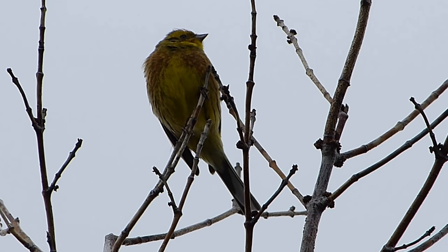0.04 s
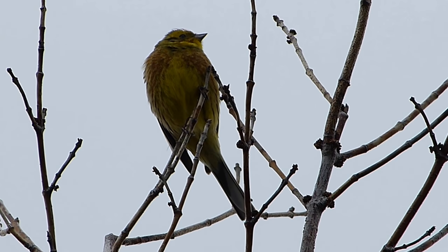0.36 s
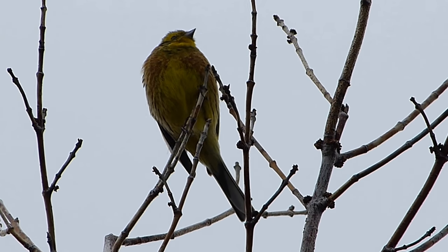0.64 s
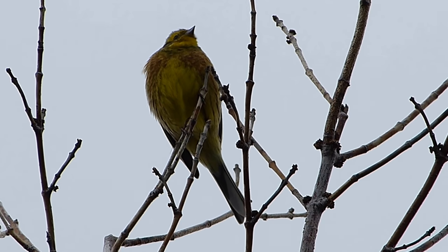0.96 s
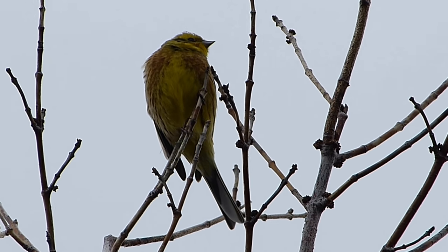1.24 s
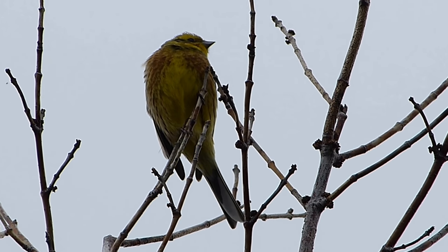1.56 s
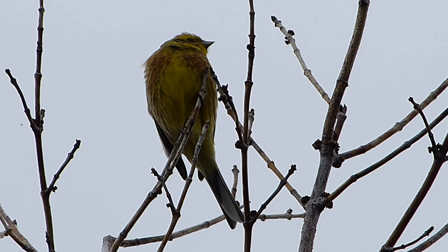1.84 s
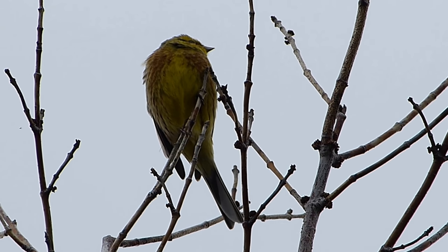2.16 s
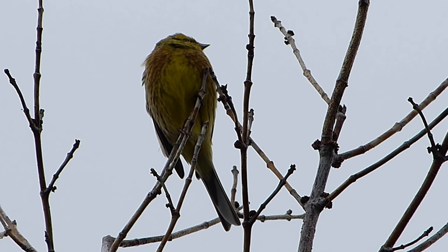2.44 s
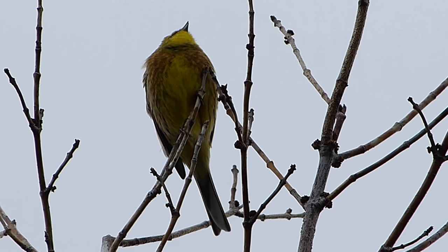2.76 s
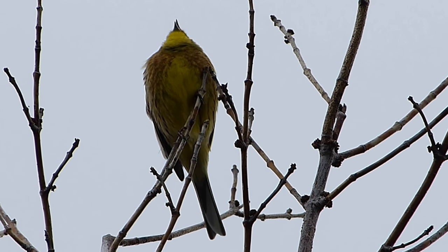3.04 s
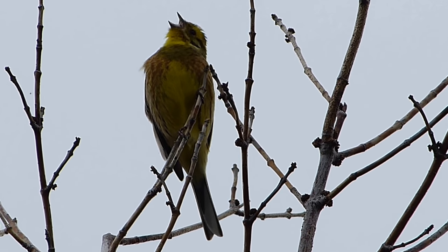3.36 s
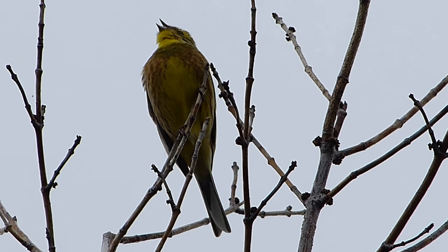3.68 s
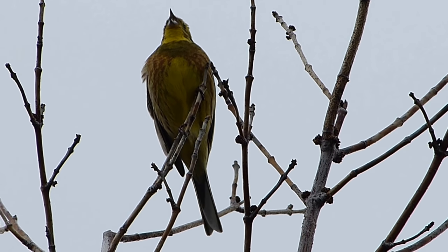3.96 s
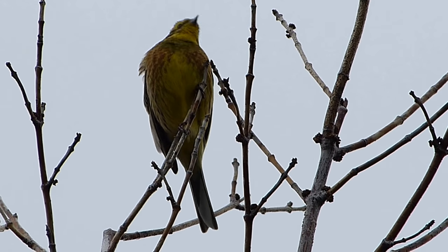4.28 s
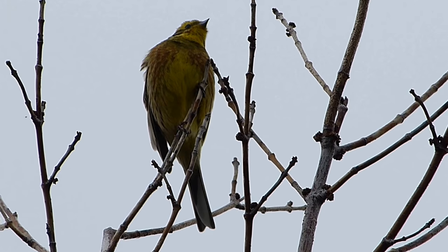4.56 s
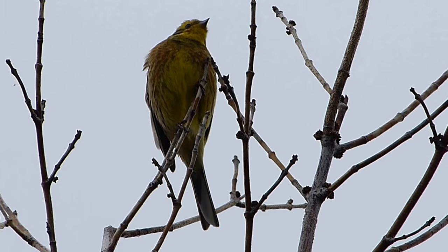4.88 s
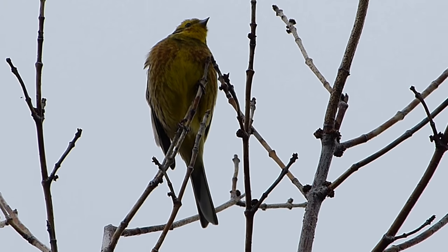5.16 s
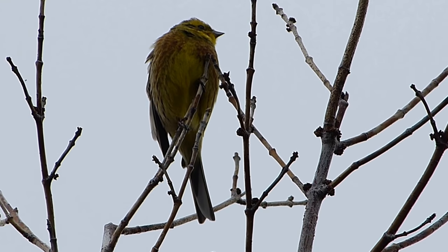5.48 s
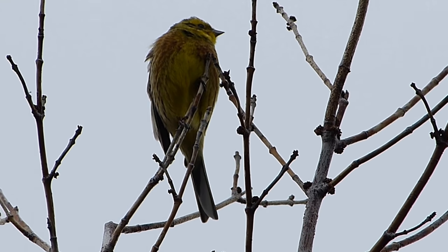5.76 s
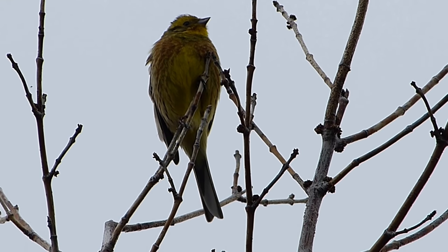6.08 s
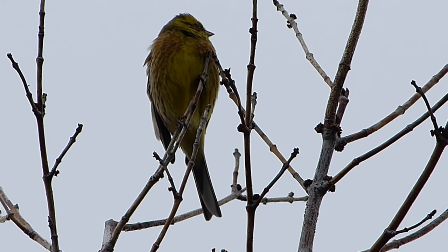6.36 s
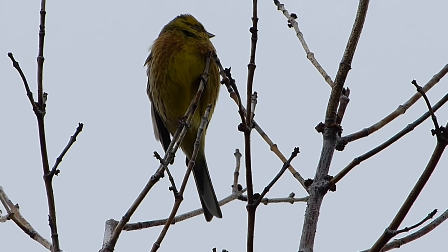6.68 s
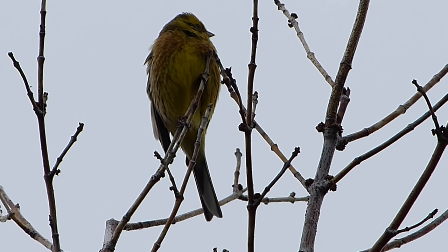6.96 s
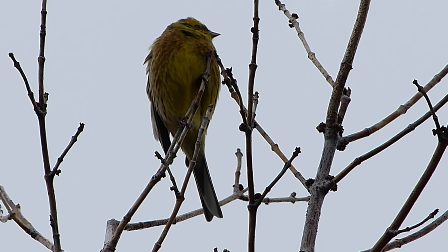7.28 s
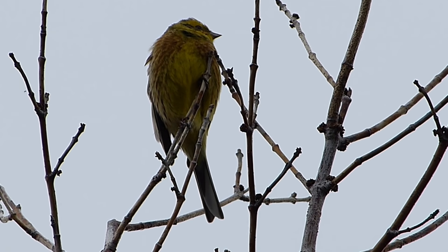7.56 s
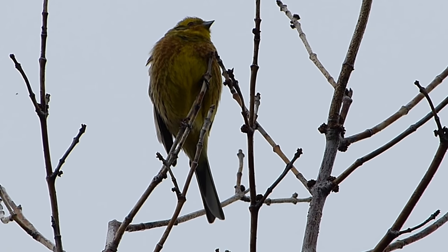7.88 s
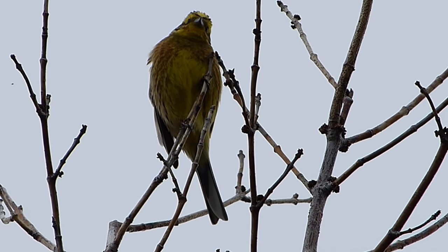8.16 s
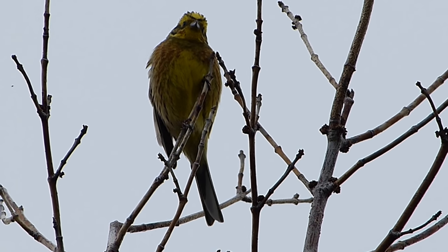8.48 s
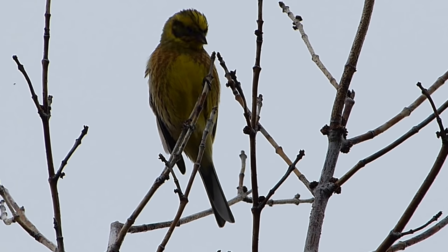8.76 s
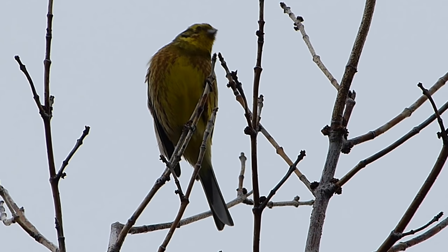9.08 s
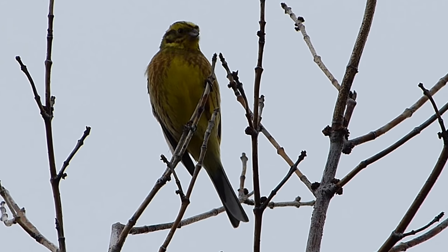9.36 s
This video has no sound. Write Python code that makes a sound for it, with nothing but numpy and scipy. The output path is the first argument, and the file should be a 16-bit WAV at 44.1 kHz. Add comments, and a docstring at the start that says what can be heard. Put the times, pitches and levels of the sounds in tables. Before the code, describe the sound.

A nearby songbird sings one swelling run of rapid, rattling whistles, while distant birds chirp over a faint traffic hush.

```python
"""Among trees, with distant traffic hushing to the left and one faint low hoot at the start.
Near the microphone a yellowhammer on a bare treetop sings ten alike syllables, swelling: each is a
trilled whistle, a hook and a rattle from both sides of the syrinx. Twigs scatter the song and the
trees around answer. Other birds chirp and buzz farther off."""
import sys
import numpy as np
from scipy import signal
from scipy.fft import rfft, irfft, next_fast_len
from scipy.io import wavfile
from scipy.ndimage import map_coordinates

SR = 44100
rng = np.random.default_rng(int(sys.argv[2]) if len(sys.argv) > 2 else 0)


def store_pcm(level_fs):
    """Save levels as 16-bit WAV."""
    pcm = np.round(np.clip(level_fs, -1, 1) * 32767).astype(np.int16)
    wavfile.write(sys.argv[1], SR, np.atleast_2d(pcm).T)


N = 420273


def amp(db):
    """Decibels to amplitude."""
    return 10 ** (np.asarray(db) / 20)


def unit(x):
    """x scaled to rms 1."""
    return x / np.sqrt(np.mean(x ** 2) + 1e-20)


def along(points, hz):
    """Reads (Hz, value) points on a log frequency axis."""
    knots_hz, values = np.transpose(points)
    return np.interp(np.log(hz + 1), np.log(knots_hz), values)


def clock(length_s):
    """Sample times in seconds."""
    return np.arange(int(length_s * SR)) / SR


def gate(t, start, end, edge):
    """Opens at start and closes at end, with smooth edges."""
    return np.sin(np.pi / 2 * np.clip(np.minimum(t - start, end - t) / edge, 0, 1)) ** 2


def wobble(t, rate):
    """A smooth random curve, rate knots a second."""
    return map_coordinates(rng.standard_normal(256), [(t - t[0]) * rate], mode="wrap")


def sine(hz):
    """A tone of rms 1 on a moving pitch."""
    return np.sqrt(2) * np.sin(2 * np.pi * (np.cumsum(hz) / SR + rng.random()))


def add(track, start_s, sound):
    """Lays a sound into a track."""
    part = track[max(round(start_s * SR), 0):][:len(sound)]
    part += sound[:len(part)]


def filtered(x, response):
    """x shaped by a gain that depends on frequency."""
    size = next_fast_len(N + SR // 2)
    return irfft(rfft(x, size) * response(np.fft.rfftfreq(size, 1 / SR)), size)[..., :N]


def rush(colour, likeness):
    """Stereo noise of rms 1 with a given colour and left-right likeness."""
    def mid_and_side(hz):
        angle = np.arccos(np.clip(along(likeness, hz), -1, 1)) / 2
        return colour(hz) * [np.cos(angle), np.sin(angle)]
    mid, side = filtered(rng.standard_normal((2, N)), mid_and_side)
    return unit(np.array([mid + side, mid - side]))


# The traffic's slow rise and fall: time_s, relative_level_db
TRAFFIC_SWELL = [(0.0, -60.5), (0.66, -62), (4.88, -62), (5.81, -60.5), (7.17, -61.5), (7.48, -60.5),
                 (9.53, -60.5)]
# Its colour before the air dulls it: frequency_hz, density_db
TRAFFIC_COLOUR = [(60, -12.5), (190, -8), (250, -6), (340, -2), (480, -3.5), (720, 0), (900, -1.5),
                  (1300, -7), (1900, -15)]
# How alike it reaches the two sides of the microphone: frequency_hz, correlation
TRAFFIC_LIKENESS = [(60, 1), (130, 0.31), (300, -0.79), (550, -0.36), (800, .2), (1400, -0.19)]


def distant_traffic(gain_db=2.5, dull_hz=2400):
    """A far road, louder to the left; the air swallows its treble on the way."""
    t = np.arange(N) / SR
    hush = rush(lambda hz: amp(along(TRAFFIC_COLOUR, hz)) / (1 + (hz / dull_hz) ** 4), TRAFFIC_LIKENESS)
    swell_db = np.interp(t, *np.transpose(TRAFFIC_SWELL))
    hush *= amp(swell_db + gain_db + .5 * wobble(t, 6.8))
    leftward_db = [(380, -.4), (700, 1.4)]
    return filtered(hush, lambda hz: amp(along(leftward_db, hz) * [[1], [-1]]))


# The colour of the open-air hiss: frequency_hz, density_db
HISS_COLOUR = [(1900, 3), (2700, 3), (8000, -1), (12000, -4.5), (15500, -9.5)]


def air_hiss(level_db=-66):
    """A thin, even hiss all around the microphone."""
    return rush(lambda hz: amp(along(HISS_COLOUR, hz)), likeness=[(2000, 0.23)]) * amp(level_db)


def far_hoot(pitch_hz=362, level_db=-66):
    """One soft, nearly steady tone, far off to the left."""
    t = np.arange(N) / SR
    hoot = sine(pitch_hz + 2 * wobble(t, 30)) * gate(t, -0.053, 0.564, 0.11)
    return hoot * amp(level_db) * np.array([[1], [.3]])


def slur(length_s, first_hz, last_hz, midway=.63, unsteady_db=3.5, scoop=.12, scoop_s=.004):
    """A far note that scoops up to its pitch, glides and settles, its loudness unsteady."""
    t = clock(length_s)
    curve = np.polyfit([0, .5, 1], [0, midway, 1], 2)  # midway: share of the glide done at half time
    glide_hz = first_hz + (last_hz - first_hz) * np.polyval(curve, t / length_s)
    hz = glide_hz * (1 - scoop * np.exp(-t / scoop_s)) + 45 * wobble(t, 300)
    loudness = unit(amp(unsteady_db * wobble(t, 140)))
    return gate(t, -.002, length_s + .002, length_s * 0.27) * loudness * sine(hz)


# Single slurs from far birds: start_s, length_s, first_hz, last_hz, level_db
FAR_CHIRPS = [(0, 0.054, 6900, 3780, -59), (0.174, 0.096, 2795, 2560, -63), (0.305, 0.027, 4350, 3640, -57),
              (0.343, .047, 4900, 4140, -62), (0.452, 0.013, 7400, 3990, -59),
              (0.459, 0.067, 3730, 2960, -60), (0.654, 0.084, 5300, 4500, -63),
              (0.798, .035, 5800, 6900, -61.5), (1.004, 0.017, 5700, 3590, -61),
              (2.818, .036, 3500, 2860, -63), (3.119, 0.043, 3300, 2710, -58),
              (3.332, .057, 2650, 2560, -61), (3.858, .064, 3100, 2500, -59.5),
              (4.41, 0.019, 3600, 4360, -55), (4.437, 0.029, 3760, 4170, -49),
              (5.63, 0.044, 3200, 2500, -63.5), (6.329, 0.082, 3455, 2690, -59.5),
              (6.448, .062, 5100, 7280, -57.5), (6.524, 0.059, 7070, 3480, -54.5),
              (6.582, 0.034, 3500, 4950, -59), (6.621, 0.013, 6700, 4350, -57.5),
              (6.684, 0.096, 2950, 3235, -59.5), (6.798, 0.042, 4290, 3840, -59),
              (7.633, 0.061, 3830, 4160, -58.5), (7.731, 0.048, 5340, 4640, -60.5),
              (8.357, .075, 3240, 2680, -66.5), (8.472, 0.027, 3623, 4500, -54),
              (8.489, 0.025, 5050, 3200, -53), (8.623, .046, 6530, 5020, -55.5),
              (8.678, 0.048, 6130, 3730, -55), (9.212, .018, 5040, 3370, -62),
              (9.337, .086, 5580, 4910, -64), (9.481, 0.049, 2950, 4100, -62.5)]


def chirping_birds():
    """Far birds drop scattered slurs, most of them falling."""
    track = np.zeros(N)
    for start_s, length_s, first_hz, last_hz, level_db in FAR_CHIRPS:
        add(track, start_s, amp(level_db) * slur(length_s, first_hz, last_hz))
    return track


def buzz(length_s, first_hz, last_hz, swing, beat_hz):
    """A far note that pulses and swings about a gliding pitch; wide swings turn it into a rasp."""
    t = clock(length_s)
    beat = sine(beat_hz * (1 + 0.046 * wobble(t, 53))) / np.sqrt(2)
    glide_hz = np.interp(t, [0, length_s], [first_hz, last_hz])
    hz = glide_hz + swing * (0.26 * beat + .5 * wobble(t, 1200))
    return (1 + 0.78 * beat) * gate(t, 0, length_s, length_s * 0.1) * sine(hz)


def farthest_chorus(count=240, centre_hz=3750, spread=.16, level_db=-74.5, note_s=0.04):
    """The farthest birds twitter at random on both sides: short, mostly falling slurs and purrs."""
    twitter = np.zeros((2, N))
    for i, (pitch, size, fall, loud, side) in enumerate(rng.uniform(-2.3, 2.3, (count, 5))):
        hz = centre_hz * np.exp(spread * pitch)
        last_hz = hz * (.9 + 0.046 * fall)
        length_s = note_s * np.exp(0.39 * size)
        note = slur(length_s, hz, last_hz) if i % 2 else buzz(length_s, hz, last_hz, 315, beat_hz=100)
        start_s = (i + rng.random()) / count * N / SR
        for channel, sign in zip(twitter, (1, -1)):
            add(channel, start_s, amp(level_db + 1.8 * loud + sign * side) * note)
    return twitter


# Buzzy notes from far ahead: start_s, length_s, first_hz, last_hz, level_db, beat_hz
FAR_BUZZES = [(0.86, .23, 3900, 3880, -68, 92), (1.676, .14, 4270, 3630, -65.5, 71),
              (2.239, 0.1, 4200, 3960, -68, 59), (4.796, .19, 3110, 3100, -73.5, 69),
              (5.678, .16, 3960, 5210, -67.5, 78), (5.729, .095, 7100, 6300, -69.5, 110),
              (7.034, 0.071, 3930, 4060, -66.5, 72), (7.15, 0.24, 5350, 4350, -68.5, 22),
              (7.793, .22, 4100, 3790, -72, 110), (9.138, 0.21, 5250, 4510, -68, 45)]


def buzzing_birds(swing_per_beat=4):
    """Far birds buzz; the faster the beat, the wider the pitch swings."""
    track = np.zeros(N)
    for start_s, length_s, first_hz, last_hz, level_db, beat_hz in FAR_BUZZES:
        note = buzz(length_s, first_hz, last_hz, swing_per_beat * beat_hz, beat_hz)
        add(track, start_s, amp(level_db) * note)
    return track


# Far runs of one slur: start_s, until_s, every_s, length_s, first_hz, last_hz, level_db
FAR_TRILLS = [(0.876, 1.55, 0.074, 0.038, 3790, 2380, -71.5), (5.207, 5.52, 0.023, 0.012, 3830, 4600, -72),
              (5.971, 6.332, .019, .008, 6520, 4960, -69), (7.65, 7.94, .113, .07, 3810, 2490, -59),
              (8.325, 8.6, 0.044, 0.011, 4080, 4700, -70.5)]


def trilling_birds(pitch_spread=0.0325, spread_db=2.0, stray=0.043):
    """Far birds repeat a slur, never quite the same in timing, pitch or level."""
    track = np.zeros(N)
    for start_s, until_s, every_s, length_s, first_hz, last_hz, level_db in FAR_TRILLS:
        for due_s in np.arange(start_s, until_s, every_s):
            late, high, loud = rng.standard_normal(3)
            pitch = 1 + pitch_spread * high
            note = slur(length_s, pitch * first_hz, pitch * last_hz)
            add(track, due_s + stray * every_s * late, amp(level_db + spread_db * loud) * note)
    return track


def syrinx(hz, second_db=-35, third_db=-44):
    """One side of the bird's voice organ: a nearly pure tone with two weak overtones."""
    return sine(hz) + amp(second_db) * sine(2 * hz) + amp(third_db) * sine(3 * hz)


def whistle(length_s, pitch_hz, bright_db, trill_hz=252, swing_hz=70, depth=0.47, fade_db_per_s=720):
    """A whistle that swells and fades, fluttering fast and most deeply where it is soft."""
    t = clock(length_s)
    progress = t / length_s
    swell = np.interp(progress, [0, 0.62], [0.063, 1])
    loudness = swell * amp(-fade_db_per_s * np.maximum(t - 0.55 * length_s, 0))
    flutter = (1 - 0.36 * loudness) * sine(trill_hz * (1 + .018 * wobble(t, 55))) / np.sqrt(2)
    # the pitch sags ever faster, then lifts a little at the end
    sag = .15 * np.minimum(progress / 0.78, 1) ** 2.8
    lift = .36 * np.maximum(progress - 0.78, 0)
    hz = pitch_hz * (1 - sag + lift) + swing_hz * flutter + 25 * wobble(t, 300)
    voice = syrinx(hz, second_db=bright_db - 33.5, third_db=bright_db - 39.5)
    return voice * loudness * (1 + depth * flutter) * gate(t, 0, length_s - .003, .009)


def hook(lead_s, after_s=0.0036, accent_hz=4000, rise_hz_per_s=80000, width_s=0.0029, lead_db=-15):
    """A quick upward flick of the lower voice: a soft lead-in, then one short accent."""
    t = clock(lead_s + after_s) - lead_s
    loudness = np.maximum(amp(lead_db), np.exp(-(t / width_s) ** 2))
    hz = accent_hz + rise_hz_per_s * t + 30 * wobble(t, 550)
    return syrinx(hz) * loudness * gate(t, -lead_s, after_s, 0.0021)


def rattle(bright_db, length_s=0.05, peak_s=0.04, beat_hz=111, mixing_db=-31,
           crest_hz=7450, sink_hz_per_s=13000, dip_hz=1350, bottom_hz=4050, dive_hz=2750):
    """Both sides of the syrinx beat and swell together: one in sinking arches, one diving between."""
    t = clock(length_s)
    cycle = (t * beat_hz * (1 + .012 * rng.normal()) + .2) % 1
    off_peak = (t / peak_s - 1) ** 2
    upper_waver, lower_waver = amp(2.5 * np.array([wobble(t, 500), wobble(t, 200)]))
    # each arch is round on top, drops fast with an accent and climbs back slowly
    dip = np.sin(np.pi * cycle ** .75) ** 4
    accent_db = 3 * np.sin(2 * np.pi * cycle)
    upper_hz = crest_hz - sink_hz_per_s * t - dip_hz * dip + 190 * wobble(t, 1500)
    upper = syrinx(upper_hz, second_db=bright_db - 35.5)
    upper += amp(-27) * rng.standard_normal(len(t))  # a little rasp
    upper *= upper_waver * amp(2 - 23 * off_peak + accent_db)
    # each dive levels out and fades at its bottom
    dive = np.clip(cycle / .6, 0, 1)
    height = np.clip(1 - dive / .8, 0, 1) ** 2
    stroke = gate(dive, 0, 1, .25) * amp(6 - 9 * dive)
    lower_hz = bottom_hz + dive_hz * height + 110 * wobble(t, 1500)
    lower = syrinx(lower_hz, second_db=bright_db - 23.5, third_db=bright_db - 35.5)
    lower *= lower_waver * stroke * amp(-2.5 - 6 * off_peak) * gate(t, -1, length_s, .016)
    # where both voices are loud they modulate each other
    mixing = amp(mixing_db + bright_db) * upper * lower
    return (upper + lower + mixing) * gate(t, 0, length_s, .006)


# The near singer's syllables, levels before each part's lift: hook_peak_s, whistle_db, rattle_db
SYLLABLES = [(2.8667, -40.5, -45), (3.0276, -31.8, -39.5), (3.1868, -27, -35), (3.3486, -23.5, -33),
             (3.5044, -21.5, -31), (3.656, -20, -29.5), (3.8093, -19.0, -32), (3.9595, -18, -29),
             (4.1128, -17, -29), (4.2678, -19, -32.5)]


def yellowhammer(full_db=-19.5, hook_lead_s=.011, low_hz=3100, high_hz=14000):
    """The treetop phrase: the louder the bird sings, the higher, longer and brighter its whistle."""
    song = np.zeros(N)
    for peak_s, whistle_db, rattle_db in SYLLABLES:
        effort_db = whistle_db - full_db
        length_s = .069 + .0004 * effort_db
        pitch_hz = 5342 + 7.5 * effort_db
        bright_db = 0.27 * effort_db
        add(song, peak_s - length_s, amp(whistle_db + 0.4) * whistle(length_s, pitch_hz, bright_db))
        add(song, peak_s - hook_lead_s, amp(rattle_db + 6) * hook(hook_lead_s))
        add(song, peak_s, amp(rattle_db + 1.5) * rattle(bright_db))
    # throat and beak pass only their own band
    return filtered(song, lambda hz: 1 / (1 + (low_hz / (hz + 1)) ** 16) / (1 + (hz / high_hz) ** 8))


def near_bounce(x, delay_s=.000813, above_hz=6000):
    """A small surface by the microphone throws back only the treble, which ripples its colour."""
    def ripple(hz):
        reflected = np.clip(hz / above_hz - 1, 0, 1)
        return 1 - reflected * np.exp(-2j * np.pi * hz * delay_s)
    return filtered(x, ripple)


def echoes(x, t60_s, delay_s):
    """The diffuse answer of twigs or trees, in two unlike channels of about unit energy."""
    t = clock(1)
    tail = rng.standard_normal((2, len(t))) * amp(-60 * t / t60_s) * (t > delay_s)
    return signal.fftconvolve(x[None], tail / np.linalg.norm(tail[0]), axes=1)[:, :N]


# One bird's calls from far ahead: start_s, level_db
FAR_RASPS = [(7.35, -66), (7.521, -56.5), (8.029, -64), (8.124, -64.5), (8.181, -64), (8.244, -65)]


def rasping_bird(length_s=0.029, pitch_hz=5750):
    """Short calls whose pitch swings so widely that they rasp."""
    track = np.zeros(N)
    for start_s, level_db in FAR_RASPS:
        add(track, start_s, amp(level_db) * buzz(length_s, pitch_hz, pitch_hz, swing=1228, beat_hz=132))
    return track


def scene():
    """From the microphone: the singer near, other birds far ahead and right, traffic beyond."""
    song = near_bounce(yellowhammer())
    birds_right = (chirping_birds() + trilling_birds()) * amp([[-1.6], [3]])
    birds_ahead = buzzing_birds() + rasping_bird()
    birds = birds_right + birds_ahead + farthest_chorus()
    # twigs beside the singer scatter from nearly its own direction, the trees from all around
    centre, wide = echoes(song, t60_s=0.18, delay_s=.0055)
    twigs = amp(-8.5) * centre + amp(-14.5) * wide * np.array([[1], [-1]])
    trees = amp(-19.5) * echoes(song, t60_s=0.57, delay_s=.02)
    far_birds = birds + amp(-5.5) * echoes(birds.mean(0), t60_s=0.58, delay_s=0.01)
    background = distant_traffic() + air_hiss() + far_hoot()
    return song * amp([[.4], [-.4]]) + twigs + trees + far_birds + background


def record(dry, top_hz=15700):
    """The camera keeps nothing above its band limit."""
    return filtered(dry, lambda hz: hz < top_hz)


dry = scene()
out = record(dry)
store_pcm(out)
```